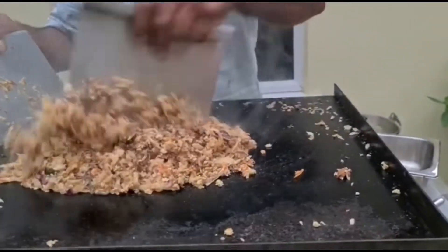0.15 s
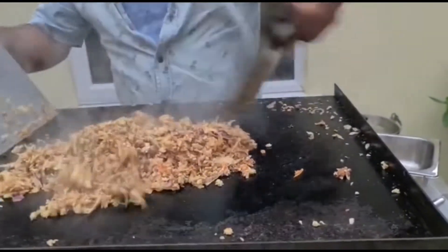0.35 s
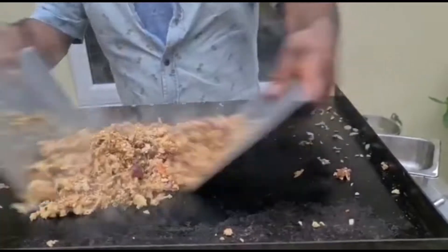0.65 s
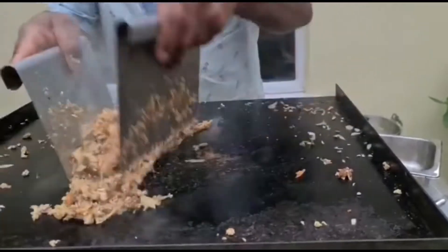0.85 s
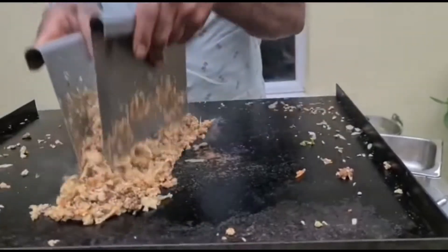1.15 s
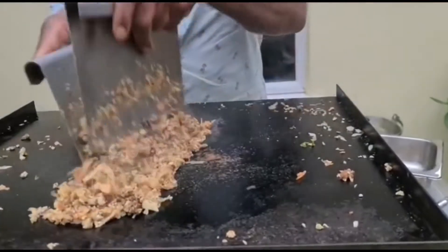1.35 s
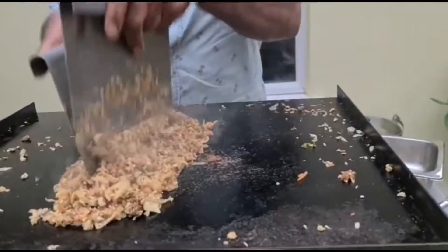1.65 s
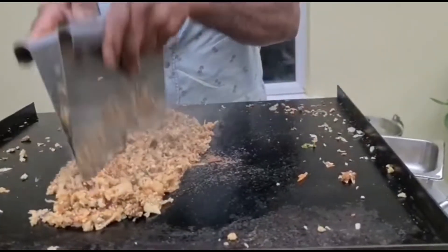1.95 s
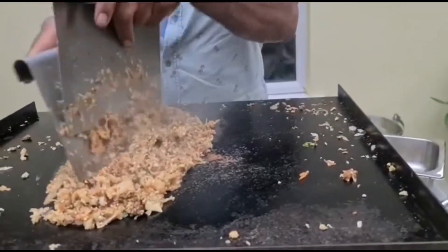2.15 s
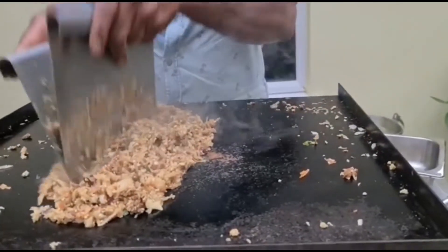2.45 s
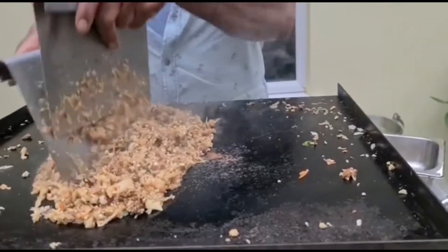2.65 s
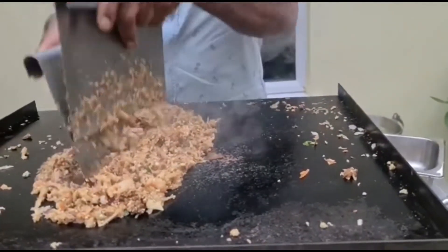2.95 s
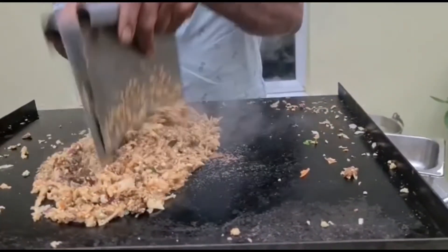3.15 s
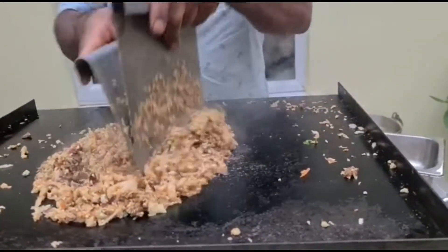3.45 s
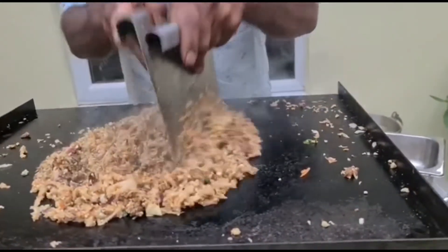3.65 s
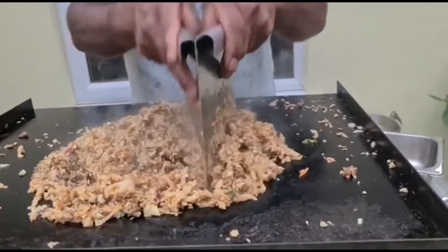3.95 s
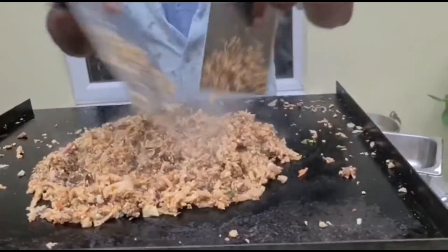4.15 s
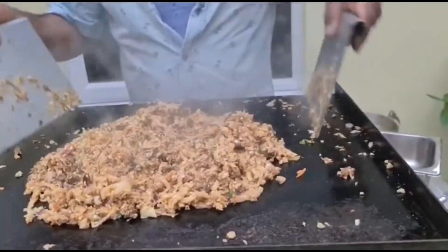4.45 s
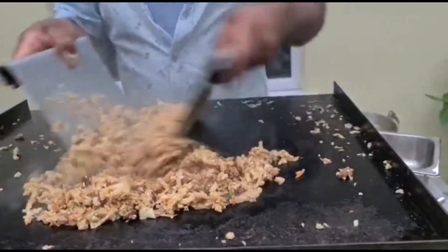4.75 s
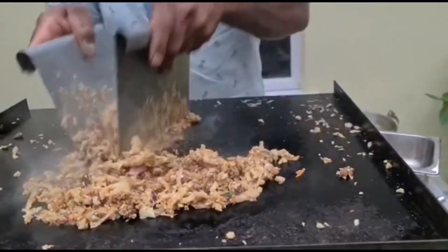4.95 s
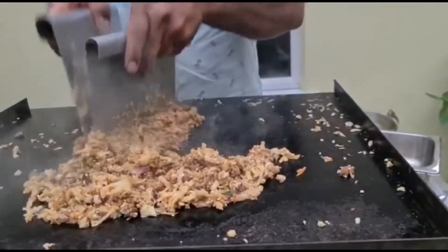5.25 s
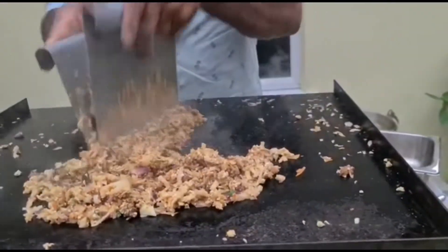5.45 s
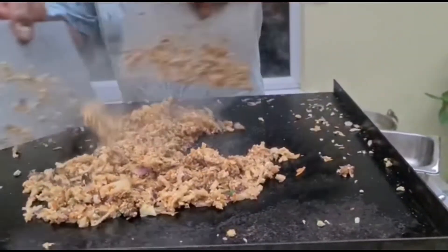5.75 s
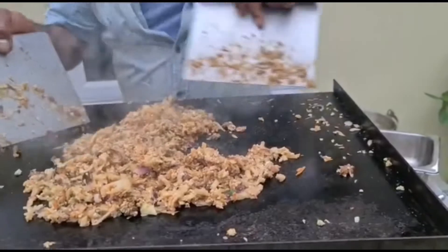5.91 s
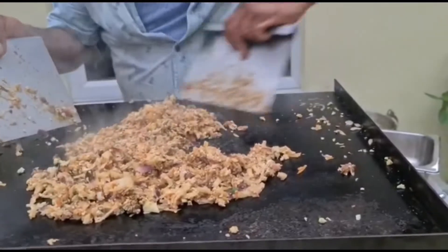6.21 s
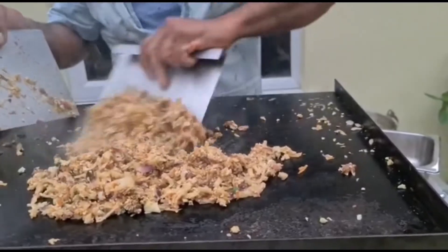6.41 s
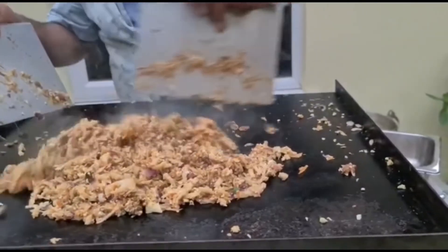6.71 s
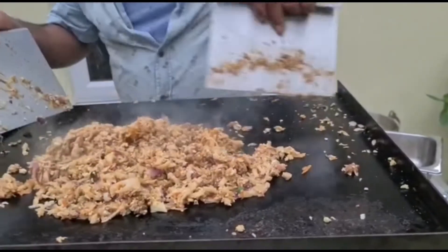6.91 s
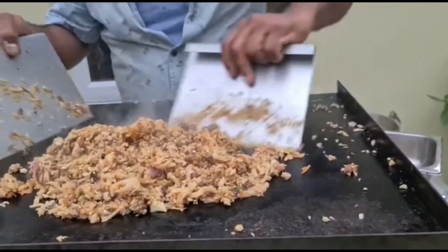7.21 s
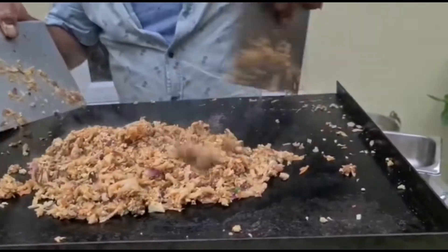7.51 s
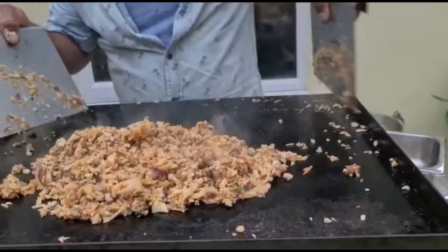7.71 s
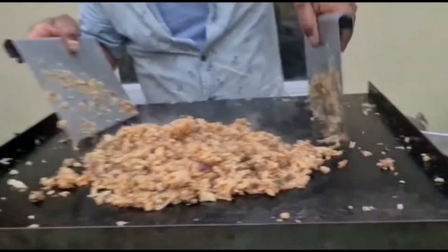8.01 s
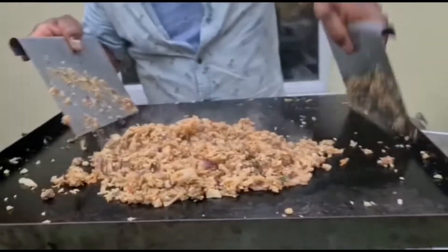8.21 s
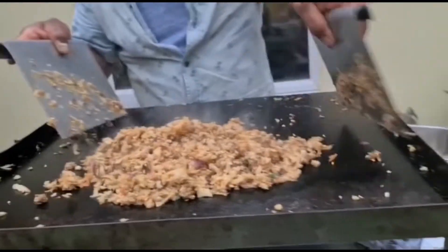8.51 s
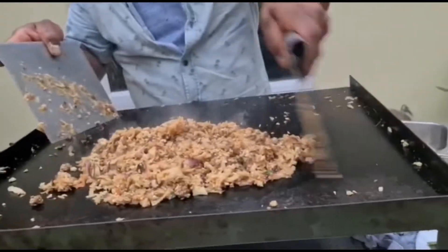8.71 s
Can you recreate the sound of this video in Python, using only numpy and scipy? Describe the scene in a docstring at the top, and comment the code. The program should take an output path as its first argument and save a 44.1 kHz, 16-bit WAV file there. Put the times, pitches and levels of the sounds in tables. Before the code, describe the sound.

Rapid metallic chopping on a flat griddle gives way to spaced clangs with scraping slides, over sizzling rice in a small yard.

```python
"""Outdoor yard: two steel scraper blades chop and turn fried rice on a flat steel griddle, heard close up.
Blows ring decaying modes of blades and plate over a noise clash; rice-cushioned blows and scuffs knock dully.
Edges scrape (grains driving the modes), swish (swelling crackle) and knead the rice (rumble).
Frying crackles throughout, fat snaps, burners and yard rumble; walls echo the steel; loud peaks clip softly."""
import sys
import numpy as np
from scipy import signal
from scipy.fft import rfft, irfft, next_fast_len
from scipy.io import wavfile
from scipy.ndimage import uniform_filter1d

SR = 44100
rng = np.random.default_rng(int(sys.argv[2]) if len(sys.argv) > 2 else 0)


def wav_out(sig):
    """Save sig, one row per channel (or a flat mono array), as 16-bit PCM at SR to the path in sys.argv[1]."""
    wavfile.write(sys.argv[1], SR, np.round(np.clip(np.atleast_2d(sig).T, -1, 1) * 32767).astype(np.int16))


N = 391166
TIME = np.arange(N) / SR
RING_TIME = TIME[:SR]
STROKE_S = 0.132  # nominal beat of the chopping

# modes: (frequency [Hz], relative level [dB], t60 [s])
RIGHT_BLADE_MODES = [(775, -8, .27), (1168, -4, .46), (1313, -6, .33), (1490, -8, .33), (1757, -1, .3),
                     (1811, -4, .22), (1886, -10, .38), (2441, -4, .28), (3229, -8, .22), (3386, -9, .26)]
PLATE_MODES = [(220, -13, .48), (266, -14, .38), (713, -13, .32), (992, -11, .3), (1712, -2, .27),
               (1941, -8, .34), (2098, -3, .44), (2627, -6, .3), (2691, -9, .22), (3779, -12, .24),
               (4280, -12, .24), (4451, -12, .27), (6008, -15, .23)]
PLATE_BOOM_MODES = [(226.4, -3, 0.89), (352, -5.5, 0.55), (367.1, 12, 0.26), (410, -21, 0.42)]
# dull knocks: blows cushioned by rice, and scuffs as the edge lifts off after a slide (6.336, 7.152 s):
# (time [s], relative thump [dB], relative knock [dB])
DULL_KNOCKS = [(0.337, -25, -23), (0.423, -26.5, -6.5), (1.159, -21.5, -36), (1.548, -24.5, -45),
               (1.775, -52, -24), (2.07, -29.5, -23), (2.298, -37, -40), (2.963, -26.5, -21.5),
               (3.142, -20.5, -39), (3.227, -35, -27), (3.778, -31, -31), (4.817, -21.5, -22.5),
               (4.917, -28, -32), (6.336, -37, -18), (7.152, -50, -20)]
# runs of even chopping strokes: (first stroke [s], last stroke [s])
CHOP_RUNS = [(1.52, 3.897), (5.312, 5.435)]
# edge lands and slides on the plate; levels relative:
# (landing [s], length [s], scrape [dB], treble bite [dB], ring drive [dB], rice swish [dB])
SCOOP_MOVES = [(0.388, 0.28, -21.5, -0.5, 5, -25.5), (4.386, .28, -22.5, -2, 0.5, -33),
               (6.054, 0.3, -27, 3, -1, -35), (6.976, .18, -23.5, 0, -1, -25.5),
               (7.711, 0.24, -23, -7, -3, -38), (8.186, 0.13, -22.5, 6, -6, -38.5),
               (8.538, 0.15, -21, 4, -1, -49)]


def undb(db):
    """Decibels to gain."""
    return 10 ** (np.asarray(db) / 20)


def unit(x):
    """Scale to rms 1."""
    return x / np.sqrt(np.mean(x ** 2))


def contour(points, hz):
    """Read (Hz, value) points on a log-frequency axis."""
    f, value = np.transpose(points)
    return np.interp(np.log(hz + 1), np.log(f), value)


def colour(x, points):
    """Filter a sound by a gain curve of (Hz, dB) points."""
    size = next_fast_len(x.shape[-1])
    hz = np.arange(size // 2 + 1) * SR / size
    return irfft(rfft(x, size) * undb(contour(points, hz)), size)[..., :x.shape[-1]]


def spread(hz, apart_hz=1000):
    """Side share: long waves reach both microphones alike, short ones unrelated."""
    return np.minimum(0.1 + (hz / apart_hz) ** 2, 1)


def stereo(mid, side):
    """Left and right from mid and side."""
    return np.array([mid + side, mid - side])


def noise_spectrum(size):
    """Frequencies and two-channel spectrum of a diffuse white noise."""
    hz = np.arange(size // 2 + 1) * SR / size
    mid, side = rfft(rng.standard_normal((2, size)))
    return hz, stereo(mid, spread(hz) * side) / np.hypot(1, spread(hz))


def add(out, s, sound):
    """Mix a sound in at time s."""
    start = max(int(s * SR), 0)
    out[:, start:start + sound.shape[1]] += sound[:, :N - start]


def swells(table, rise_share=1):
    """Sum of Gaussian bells (peak s, fall sigma s, dB); the rise takes rise_share of the fall's time."""
    t = TIME[::32]  # coarse grid, held for 32 samples
    total = 0
    for peak_s, sigma_s, db in table:
        sigma = np.where(t < peak_s, rise_share * sigma_s, sigma_s)
        total = total + undb(db) * np.exp(-np.minimum(((t - peak_s) / sigma) ** 2 / 2, 50))
    return total.repeat(32)[:N]


def wander(rate_hz):
    """Random line of spread near 1 through rate_hz points a second, held after 1000 points."""
    points = rng.standard_normal(1000)
    return 1.2 * np.interp(TIME * rate_hz, np.arange(len(points)), points)


def grains(rate_hz, scatter_db):
    """Random clicks at rate_hz, a few far larger than the rest."""
    size = undb(scatter_db * np.minimum(rng.exponential(size=(2, N)), 6))
    return unit(size * rng.standard_normal((2, N)) * (rng.random(N) < rate_hz / SR))


def rings(modes, count, scatter_db):
    """count stereo rings of one object; every point of contact weights the modes anew."""
    hz, db, t60_s = np.transpose(modes)
    decay = np.log(1000) / t60_s[:, None]
    waves = np.exp((2j * np.pi * hz[:, None] - decay) * RING_TIME)
    weight = undb(db + scatter_db * rng.standard_normal((count, len(hz))))
    phase = 2 * np.pi * rng.random((count, len(hz)))
    # each mode radiates its own pattern, so it meets the two microphones out of step
    turn = rng.choice([-1, 1], len(hz)) + 1.22 * rng.standard_normal((count, len(hz)))
    skew = np.arctan(spread(hz)) * turn
    gains = weight[:, None] * np.exp(1j * stereo(phase, skew)).transpose(1, 0, 2)
    return (gains.reshape(2 * count, -1) @ waves).imag.reshape(count, 2, -1)


def crowd(ripple_db=6.5, width_hz=17):
    """The plate's hundreds of weak modes, as narrow peaks and dips: one gain per Hz."""
    ripple = unit(uniform_filter1d(rng.standard_normal(SR // 2 + 1), width_hz))
    # low modes lie too far apart to form a crowd
    depth = np.minimum(np.arange(len(ripple)) / 3000, 1)
    return unit(undb(ripple_db * depth * ripple))


def blows(plate, clash_gain_db=5, left_db=4.0, right_db=1, plate_db=5):
    """Steel on steel: both blades and the plate ring over the clash; a harder contact is brighter."""
    # relative levels: (time [s], force [dB], contact hardness [dB], treble [dB],
    # left blade ring [dB], right blade ring [dB], plate ring [dB])
    steel_blows = [(0.305, -25.5, 11.5, -20.5, -32, -20, -30), (0.391, -13, 4.5, -13.5, -31, -16, -35),
                   (1.513, -21, 3, -21, -34, -30, -43), (1.675, -10, 2, -23, -17.5, -15.5, -21),
                   (1.939, -11, 8.5, -15, -11.5, -12, -12.5), (2.338, -8, 0, -17.5, -34, -15.5, -13.5),
                   (2.448, -12.5, 8, -13.5, -14, -10.5, -8.5), (2.59, -7.5, 0, -12, -25, -19, -17.5),
                   (2.726, -13.5, 8, -21.5, -32.5, -14, -13.5), (3.142, -27, -2, -35, -37, -33, -33),
                   (3.384, -11, -2, -15, -34, -17, -21.5), (3.525, -19, -7, -34, -25, -25, -25.5),
                   (3.649, -7.5, 1.5, -11.5, -33, -11.5, -18), (3.895, -12.5, 6, -17.5, -17.5, -11, -13.5),
                   (4.393, -12.5, 1.5, -19.5, -34, -8.5, -43), (5.084, -11, 3.5, -17.5, -22.5, -19.5, -23),
                   (5.302, -24.5, -3, -25.5, -53, -49, -51), (5.437, -11.5, 11, -17.5, -13.5, -13.5, -17.5),
                   (6.061, -7, 4, -15, -33, -11, -18.5), (6.978, -10.5, -1, -19.5, -35, -12.5, -42),
                   (7.735, -9.5, -4, -19, -37, -18, -34), (8.193, -7.5, 0.5, -18.5, -33, -17.5, -26),
                   (8.551, -9, 2, -16, -17, -15, -16.5)]
    # (frequency [Hz], relative level [dB], t60 [s])
    left_blade_modes = [(735, -7, .42), (1036, -6, .34), (1152, -18, .42), (1326, -9, .42), (1646, .5, .66),
                        (2067, -6, .36), (2347, -12, .3), (2584, -4, .28), (2972, -12, .3), (3556, -9, .28),
                        (4727, -13, .2), (5033, -14, .2)]
    thump_db, boom_db, drum_db = -8, -17, -12.5  # relative to the force
    buried_t60_s, bare_t60_s = 0.34, 0.36  # clash dies sooner when the blades stand in the heap
    out = np.zeros((2, N))
    count = len(steel_blows)
    left = rings(left_blade_modes, count, scatter_db=1.7)
    right = rings(RIGHT_BLADE_MODES, count, scatter_db=1.7)
    ring = rings(PLATE_MODES, count, scatter_db=1.7)
    boom = rings(PLATE_BOOM_MODES, count, scatter_db=2.5) * (1 - np.exp(-RING_TIME / 0.0057))
    drum = rings(PLATE_MODES[:2], count, scatter_db=1) / undb(PLATE_MODES[0][1])
    for k, (s, force, hard, treble, left_ring, right_ring, plate_ring) in enumerate(steel_blows):
        buried = any(first - STROKE_S < s < last + STROKE_S for first, last in CHOP_RUNS)
        t60_s = buried_t60_s if buried else bare_t60_s
        clashing = clash(plate, force + thump_db, force, force + hard, treble, t60_s)
        blades = undb(left_ring + left_db) * left[k] + undb(right_ring + right_db) * right[k]
        griddle = undb(plate_ring + plate_db) * ring[k] + undb(force + boom_db) * boom[k]
        if not buried:  # free of the heap's weight, the plate drums in low modes
            griddle = griddle + undb(force + drum_db) * drum[k] * (1 - np.exp(-RING_TIME / 0.03))
        add(out, s, blades + griddle + undb(clash_gain_db) * clashing)
    return out


def clash(plate, thump_db, clash_db, bite_db, treble_db, t60_s,
          damping=0.05, bloom_400hz_s=0.013, crack_db=3, crack_fade_s=0.012):
    """A crack, then a wash of weak modes whose treble dies first and whose bass swells late."""
    # (frequency [Hz], relative density [dB per Hz])
    clash_spectrum = [(40, -7), (85, 1), (125, -9.5), (170, -4.5), (230, -5), (300, 1.5), (420, 7),
                      (580, -0.5), (850, 4), (1700, 6.5), (3200, -7), (5000, 8.5), (9000, 1), (16000, -2.5)]
    hz, noise = noise_spectrum(SR)
    force = [(500, thump_db + 15), (900, clash_db + 6.0), (1900, clash_db - 1.5),
             (2700, bite_db + 5), (3600, bite_db - 3.5), (5000, treble_db - 8.0)]
    noise = noise * plate * undb(contour(clash_spectrum, hz) + contour(force, hz))
    centres_hz = 250 * 2. ** np.arange(7)
    out = 0
    for centre, share in zip(centres_hz, np.eye(len(centres_hz))):
        band = irfft(noise * np.interp(hz, centres_hz, share))
        # t60_s holds up to 2 kHz and shortens above
        fade = np.exp(-np.log(1000) * RING_TIME / t60_s * max(centre / 2000, 1) ** damping)
        bloom = 1 - np.exp(-RING_TIME * centre / (bloom_400hz_s * 400))
        out = out + band * fade * bloom
    return out * (1 + undb(crack_db) * np.exp(-RING_TIME / crack_fade_s))


def dull_knocks(plate, knock_gain_db=5, low_db=-10, soft_db=-1, dull_db=-9, dead_db=-16):
    """Rice-cushioned blows and lift-off scuffs: a soft contact thumps the plate, which hardly rings."""
    out = np.zeros((2, N))
    booms = rings(PLATE_BOOM_MODES, len(DULL_KNOCKS), scatter_db=4.0)
    onset = 1 - np.exp(-RING_TIME / 0.0018)
    for (s, thump, knock), boom in zip(DULL_KNOCKS, booms):
        knocking = clash(plate, thump + soft_db, knock, knock + dull_db, knock + dead_db, t60_s=0.17)
        add(out, s, (undb(thump + low_db) * boom + undb(knock_gain_db) * knocking) * onset)
    return out


def slide(s, length_s):
    """Gain curve of one slide: the edge lands, gathers speed, slows and lifts off."""
    peak_share, sigma_share, release_s = 0.75, 0.38, 0.042  # fastest late in its length
    speed = swells([(s + peak_share * length_s, sigma_share * length_s, 0)])
    return speed * (TIME > s) * np.exp(-np.clip(TIME - s - length_s, 0, 1) / release_s)


def scrapes(plate, ring_db=-5, plate_db=-4, chatter_db=1.5, shift_db=3.5):
    """The edge catches and slips on the crusted steel, which keeps blade and plate ringing."""
    # (frequency [Hz], relative density [dB per Hz])
    scrape_spectrum = [(100, -41), (300, -0.5), (600, -2.5), (1200, 2), (1900, 0), (3500, -4),
                       (6000, -11.5), (16000, -16.5)]
    grit = colour(grains(rate_hz=4000, scatter_db=1.5), scrape_spectrum)
    grit = signal.fftconvolve(grit, irfft(plate)[None, :SR // 2], axes=1)[:, :N]
    grit = unit(grit * undb(chatter_db * wander(130)))
    # the point of contact travels, so low and high modes vary separately
    low = signal.sosfiltfilt(signal.butter(2, 1600, fs=SR, output="sos"), grit)
    high = (grit - low) * undb(shift_db * wander(22))
    low = low * undb(shift_db * wander(22))
    slips, drive = 0, 0
    for s, length_s, db, bite, ring, _ in SCOOP_MOVES:
        rasp = (low + undb(bite) * high) * undb(db) * slide(s, length_s)
        slips = slips + rasp
        drive = drive + undb(ring) * rasp
    blade = rings(RIGHT_BLADE_MODES, count=1, scatter_db=1)[0]
    griddle = rings(PLATE_MODES, count=1, scatter_db=1)[0]
    ringing = signal.fftconvolve(drive, blade + undb(plate_db) * griddle, axes=1)[:, :N]
    return slips + undb(ring_db) * np.std(slips) * unit(ringing)


def strokes():
    """(s, dB) of every chopping stroke: an even beat of alternating hands, as strong as the effort."""
    # press on the rice: (time [s], relative level [dB])
    press_effort = [(1.52, -21), (1.66, -10), (2.05, -18), (2.45, -17.5), (2.7, -24), (2.95, -25),
                    (3.12, -21), (3.65, -19), (3.9, -22), (5.31, -20), (5.43, -18.5)]
    second_early_s, second_db = 0.0061, -2.5  # every second stroke is early and lighter
    out = []
    for first, last in CHOP_RUNS:
        count = round((last - first) / STROKE_S) + 1
        for k, s in enumerate(np.linspace(first, last, count)):
            second = k % 2
            db = np.interp(s, *np.transpose(press_effort)) + second * second_db
            out.append((s - second * second_early_s, db))
    return out


def swishing():
    """Gain curve of edges pushing through hot rice: chopping strokes, then landing and slide of each scoop."""
    splash_fade_s, splash_db = 0.037, 17.5  # landing edge flattens wet rice: a short flare
    gain = swells([(s, 0.026, db) for s, db in strokes()], rise_share=0.6)[None]
    for s, length_s, *_, db in SCOOP_MOVES:
        gain = gain + undb(db) * slide(s, length_s)
        add(gain, s, undb(db + splash_db) * np.exp(-RING_TIME[None] / splash_fade_s))
    return gain


def frying(sizzle_db=3.5, swish_db=0):
    """Tiny steam bursts crackle all the time, and flare when a blade presses wet rice onto the plate."""
    # (time [s], relative level [dB])
    sizzle_levels = [(0.0, -33.5), (0.22, -30), (0.49, -26.5), (0.69, -34.5), (1.45, -31), (1.75, -29),
                     (4.99, -37.5), (5.34, -31.5), (5.66, -40.5), (6.0, -36.5), (6.17, -40.5),
                     (6.67, -31.5), (6.87, -28.5), (8.87, -36)]
    # spectra: (frequency [Hz], relative density [dB per Hz])
    sizzle_spectrum = [(200, -52), (1000, -8), (2800, -5), (5000, 0), (9000, 0.5), (12500, 3), (16000, 2.5)]
    swish_spectrum = [(200, -32), (1000, 6), (3000, 0), (5500, 0.5), (8000, 1), (12500, 6.5), (16000, -1)]
    bed = unit(colour(grains(rate_hz=9000, scatter_db=1.8), sizzle_spectrum))
    flare = unit(colour(grains(rate_hz=14000, scatter_db=1.2), swish_spectrum))
    bed_gain = undb(sizzle_db + np.interp(TIME, *np.transpose(sizzle_levels)))
    return bed * bed_gain + undb(swish_db) * flare * swishing()


def pops(pop_db=-5, fade_s=0.00034):
    """Bursting drops of fat: single sharp snaps of fast-fading noise."""
    # (time [s], relative level [dB])
    fat_bursts = [(4.9181, -12.5), (5.7239, -10.5), (7.589, -14), (7.677, -5.5)]
    out = np.zeros((2, N))
    for s, db in fat_bursts:
        snap = colour(rng.standard_normal((2, SR)), [(300, 13), (2000, -2), (16000, 16.5)])
        add(out, s, undb(db + pop_db) * snap * np.exp(-RING_TIME / fade_s))
    return out


def kneading():
    """Gain curve of rice squeezed against the plate just after strokes and dull knocks."""
    lag_s, sigma_s, stroke_db, knock_db = 0.089, 0.099, -21.5, -17.5
    presses = [(s, db + stroke_db) for s, db in strokes()]
    presses += [(s, db + knock_db) for s, db, _ in DULL_KNOCKS]
    return swells([(s + lag_s, sigma_s, db) for s, db in presses])


def rumble(lump_db=3):
    """Rice squeezed under the edges rubs the plate, which rumbles unevenly."""
    # (frequency [Hz], relative density [dB per Hz])
    rumble_spectrum = [(40, -3.5), (85, -4), (125, -13), (220, 0), (430, -5.5), (700, -11.5), (1500, -14),
                       (4000, -70)]
    _, noise = noise_spectrum(2 * next_fast_len(N // 2 + 1))
    rubbing = unit(colour(irfft(noise)[:, :N], rumble_spectrum))
    return kneading() * undb(lump_db * wander(25)) * rubbing


def air(air_db=-45):
    """Low steady rumble of the burners and the yard."""
    # (frequency [Hz], relative density [dB per Hz])
    air_spectrum = [(20, -12), (35, -6), (58, 2), (85, -5.5), (130, -13.5), (220, -13.5), (400, -13.5),
                    (900, -22), (3000, -29)]
    _, noise = noise_spectrum(2 * next_fast_len(N // 2 + 1))
    return undb(air_db) * unit(colour(irfft(noise)[:, :N], air_spectrum))


def yard(x, echo_db=-16, t60_s=0.6):
    """Nearby walls send back a short, bright scatter."""
    tail = colour(rng.standard_normal((2, SR)), [(150, -11.5), (700, -6.0), (2500, -9.0), (12000, -3.0)])
    tail = tail * np.exp(-np.log(1000) * RING_TIME / t60_s) * (RING_TIME > 0.012)
    tail = tail / np.sqrt(np.sum(tail ** 2) / 2)
    return x + undb(echo_db) * signal.fftconvolve(x, tail, axes=1)[:, :N]


def scene():
    """Blades, plate and food in the yard."""
    plate = crowd()
    steel = blows(plate) + dull_knocks(plate) + scrapes(plate)
    return yard(steel) + rumble() + frying() + pops() + air()


def record(dry, ceiling=1, top_hz=16050):
    """Soft clipping rounds off the loudest peaks; a steep low-pass cuts the top."""
    rounded = dry / (1 + (dry / ceiling) ** 8) ** (1 / 8)
    return signal.sosfilt(signal.ellip(10, 0.2, 70, top_hz, fs=SR, output="sos"), rounded)


dry = scene()
out = record(dry)
wav_out(out)
```